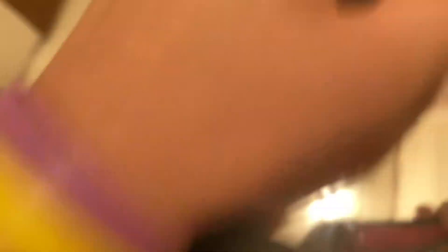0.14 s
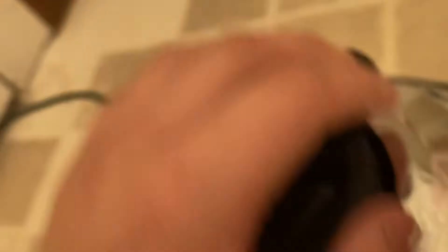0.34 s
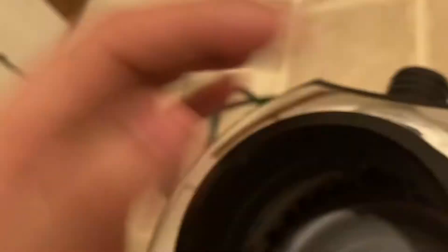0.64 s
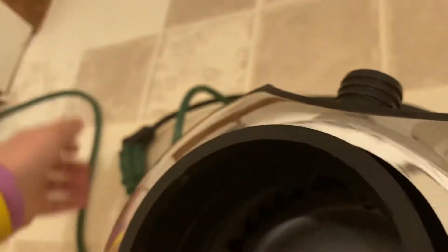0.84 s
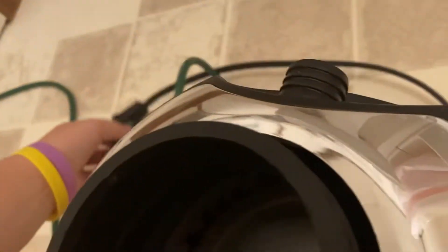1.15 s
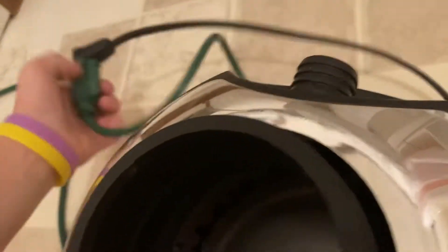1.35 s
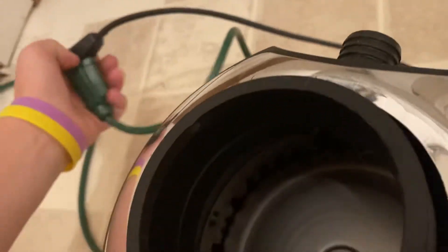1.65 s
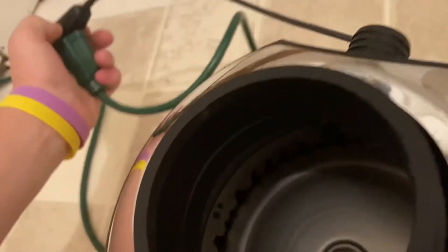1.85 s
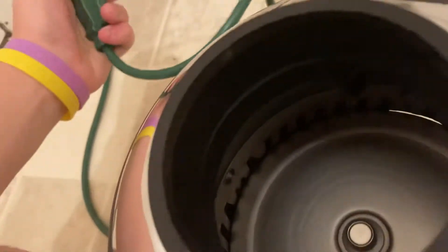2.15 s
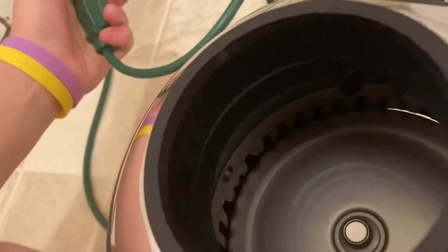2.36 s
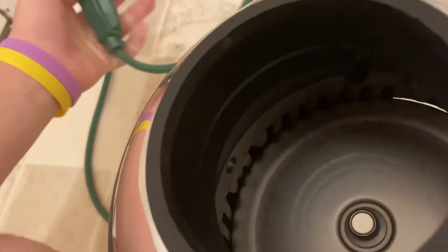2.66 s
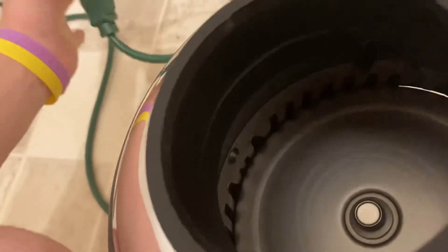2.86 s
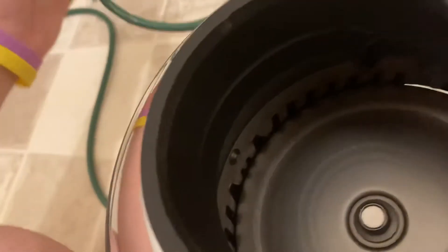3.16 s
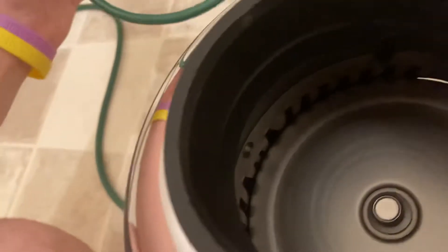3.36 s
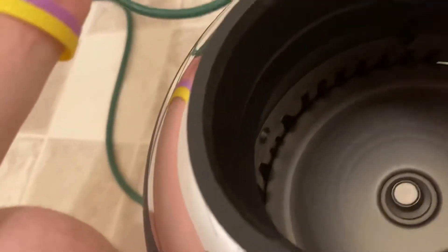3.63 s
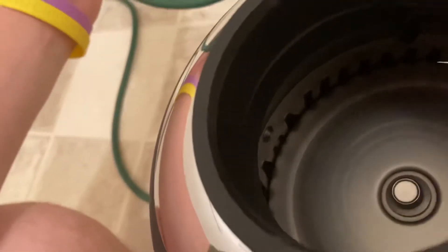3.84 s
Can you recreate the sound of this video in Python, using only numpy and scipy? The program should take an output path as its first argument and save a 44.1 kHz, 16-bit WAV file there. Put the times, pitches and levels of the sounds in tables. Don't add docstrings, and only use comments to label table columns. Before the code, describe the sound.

A loose garbage disposal buzzes and chatters loudly, then is unplugged and coasts down with rhythmic scraping

```python
import sys
import numpy as np
from scipy import signal
from scipy.fft import rfft, irfft, next_fast_len
from scipy.io import wavfile

SR = 44100
rng = np.random.default_rng(int(sys.argv[2]) if len(sys.argv) > 2 else 0)


def wav_out(sig):
    wavfile.write(sys.argv[1], SR, np.round(np.clip(np.atleast_2d(sig).T, -1, 1) * 32767).astype(np.int16))


def to_linear_factor(level_db):
    exponent = np.asarray(level_db, float) / 20
    return 10 ** exponent


N = 176400
T = np.arange(N) / SR
PAD = next_fast_len(N + SR // 2)
HZ = np.arange(PAD // 2 + 1) * SR / PAD + 1e-9

MAINS_HZ, RUN_HZ = 60, 29.773
OFF_S, DRAG_HZ_S, EASE_HZ_S2 = 2.14, 8.26, 1.18
CUT_S, CUT_FALL_S, HUM_FALL_S = 2.136, 0.00083, 0.017
BEAT_S = 1.13
BEAT_AT = .92
CHATTER_DB, CHATTER_S, SPREAD_DB, JITTER_S = 6, 0.0012, 3.5, 0.0003
LOCKED_DB, WOBBLE_DB, TICK_DB = -2, 1.5, -5
ON_DB, OFF_DB, LOW_ON_DB = 9, 17, -22.5
RUB_DEPTH_DB, RUB_AT, RUB_EDGE = 5.5, 0.008, 4
KNOCK_DB, KNOCK_AT, KNOCK_TURNS = 2.5, .06, .09
SNAP_DB, SNAP_S = -40.5, 0.0054
CUPPED_S, CUPPED_DB, CUPPED_HZ = 0.1893, -23.5, 380.8
CUPPED_PEAK_S, CUPPED_RISE_HZ_S = 0.033, 168
NODE_HZ, NODE_DB_S = 240, 9
DIFFUSE_DB, LOW_DIFFUSE_DB, SCATTER_DB = -16, -8, -3
CUTOFF_HZ = 15780

# (multiple of half mains [1], level [dB], left lead [rad])
FIELD_TONES = [(4, -34, 1.4), (8, -38, -2.3), (12, -36, -.6), (13, -49, .2), (14, -48, 1.3), (16, -43, .7),
               (20, -47, 2.6), (27, -36, .4), (28, -45, .5), (29, -37, 1.1), (35, -46, .4), (40, -43, .7),
               (41, -43, .9), (71, -48, 3.1), (75, -43, -2.4), (76, -37, -2.4), (77, -39, -2.3),
               (116, -42, .7), (117, -43, .7), (120, -49, .8)]
# (multiple of speed [1], sideband of twice mains [1], level [dB], left lead [rad])
ROTOR_TONES = [(2, 0, -37, .2), (4, 0, -41, .8), (6, 0, -47, 2), (8, 0, -44, 2.5), (11, 0, -49, -.5),
               (16, 0, -53, .5), (38, 0, -45, 1.5), (40, 0, -44, .4), (42, 0, -49, 1.2), (52, -2, -48, 2.9),
               (52, 0, -48, -.4), (52, 1, -43, -1.9), (52, 2, -53, -.4), (104, -1, -50, -.7),
               (104, 0, -38, 1), (104, 1, -48, .3)]
# (time [s], chatter [dB], shell ring [dB], hum [dB])
MICROPHONE_VIEW = [
    (0, -44.5, -52, -3.5),
    (.12, -44.5, -47.5, -5.5),
    (.2, -38.5, -41.5, -6),
    (.33, -34, -35.5, -3.5),
    (.5, -32.5, -36.5, -2.5),
    (.62, -30, -30, -1.5),
    (1.1, -29, -29, 1),
    (1.6, -30, -30.5, -0.5),
    (2.12, -30.5, -31.5, 0.5),
]
# (time [s], rub level [dB], unbalance level [dB])
COASTING = [
    (2.2, -46.5, -37),
    (3.502, -50, -40),
    (4.0, -52.5, -51),
]
# (multiple of speed [1], level [dB])
UNBALANCE_TONES = [(1, -27), (2, -5.5), (3, -7), (4, 4.5), (5, -17), (6, -2.5), (7, -21), (8, -15.5),
                   (9, -22), (10, -12.5), (11, -32), (12, -37), (13, -11), (14, -21), (15, -4.5)]
# (frequency [Hz], gain [dB])
FLOOR_RESPONSE = [(35, 5.5), (65, 9), (85, -3.5), (150, -3), (205, 4), (330, -8.5)]
# (frequency [Hz], width [Hz], level [dB])
SHELL_POWERED = [(352, 13, -4), (478, 40, -9), (866, 153, -7), (1204, 52, 6), (1507, 7.5, -1),
                 (2253, 79, 3), (3200, 70, -2), (3543, 39, 4.5), (4230, 37, -31), (5006, 100, 5),
                 (5690, 320, -3), (7400, 120, -9), (8510, 250, -7), (10560, 640, -15.5)]
SHELL_COASTING = [(324, 21, -2), (459.4, 29, -5), (1228.4, 63.4, 2.5), (2055, 51, 2), (2324, 99, 1),
                  (2485, 43, 5.5), (3540, 30, -2.5), (5000, 200, -16), (5460, 450, -7), (7050, 180, -10.5),
                  (8080, 170, -8), (9370, 690, -14.5), (10370, 840, -20.5), (12600, 100, -30)]
# (frequency [Hz], level [dB])
BED_POWERED = [(230, -22), (650, -21), (1800, -14), (4400, -16), (6500, -13.5), (12000, -17), (13500, -32),
               (15500, -52)]
BED_COASTING = [(250, -10.5), (750, -29.5), (1700, -14.5), (4000, -20.5), (6500, -23), (12000, -25.5),
                (13300, -52), (15000, -57)]
# (frequency [Hz], left lead [rad])
PORT_LEAD = [(0, 0), (1400, .7), (2300, 3.1), (3550, 5.2), (4200, 6.3), (5300, 9.0), (6950, 6.3),
             (15800, -6.3)]
# (frequency [Hz], lean [dB])
LEAN_POWERED = [(200, 1), (400, -3.5), (800, -1.5), (1300, 1.5), (8000, -0.3)]
LEAN_COASTING = [(200, 1.2), (1200, 2.6), (8000, .3)]
BEAT_LEVELS = [1.5, 0, 1.5, -21.5]
# (time [s], peak level [dB])
HARD_KNOCKS = [(0.1938, -21), (0.3273, -19), (0.4555, -20.5), (0.7917, -18), (0.8895, -16), (0.9418, -17),
               (1.0105, -21), (1.0773, -17), (1.1437, -17.5), (1.3969, -18), (1.4798, -21), (1.5382, -21),
               (1.564, -22.5), (1.5969, -17.5), (1.7337, -19), (1.7636, -15.5), (1.882, -21),
               (1.9391, -17.5)]
# (time [s], level [dB], frequency [Hz], t60 [s])
BODY_BUMPS = [
    (0.397, -12.5, 62, 0.065),
    (0.53, -33, 122, 0.16),
    (2.139, -27, 416, 0.22),
    (0.341, -20.5, 112, 0.13),
    (2.723, -43, 210, 0.091),
    (2.724, -31.5, 325, 0.25),
]
# (time [s], level [dB])
PLUG_HITS = [
    (2.7078, -29.5),
    (2.7108, -23),
    (2.728, -33),
]
# (frequency [Hz], level [dB], t60 [s])
PLUG_RING = [(1530, -1, 0.06), (1250, -14, .03), (2580, -4, 0.03), (3280, -11, 0.029), (8100, -6, 0.01)]
# (time [s], half length [s], frequency [Hz], half width
# [Hz], level [dB])
BAND_SWELLS = [(.1, .25, 480, 23, -14), (.1, 0.45, 763, 26, 11.5), (0.086, 0.11, 875, 15, -5),
               (0.44, 1.4, 264, 56, -9), (0.68, 0.11, 120, 25, -3), (0.27, 0.49, 2290, 130, -13),
               (1.21, 0.22, 2280, 110, 4.5), (1.66, 0.41, 2290, 110, -6.5), (0.42, 0.25, 1810, 160, 8.5),
               (1.6, 1.3, 1870, 74, -6), (0.15, 0.27, 3540, 220, -11.5), (0.23, .25, 1550, 20, 9),
               (2.18, 0.23, 3030, 220, -6.5), (3.6, 0.78, 2510, 27, -9), (0.346, 0.084, 318, 30, 11),
               (1.66, 0.36, 485, 16, -6.5), (0.56, 0.12, 480, 30, -2.5), (0.44, 0.84, 361, 17, -3),
               (2.5, 2, 60, 16, 1), (0.87, 0.18, 1270, 80, 2), (1.6, 1.2, 2860, 100, -7.5),
               (3.95, 0.63, 3900, 170, -22), (3.6, 0.2, 2060, 92, 6), (3.0, 0.97, 4680, 240, 7.5),
               (2.5, 5.2, 9730, 590, 2.5), (2.0, 4.0, 14000, 830, 2), (0.24, .2, 690, 53, -11),
               (2.53, 0.12, 325, 30, -11), (.26, 0.059, 140, 52, 0), (1.5, .8, 4320, 110, -9),
               (0.22, 0.35, 2830, 100, 8.5), (2.28, 0.17, 1110, 190, 4.5), (0.32, 0.095, 440, 55, 3.5),
               (1.2, 0.47, 684, 55, -4)]


def rms_one(x):
    return x / np.sqrt(np.mean(x ** 2) + 1e-20)


def in_time(rows):
    s, *columns = np.transpose(rows)
    return [np.interp(T, s, c) for c in columns]


def at_hz(points, hz):
    point_hz, value = np.transpose(points)
    return np.interp(np.log(hz), np.log(point_hz), value)


def drift(rate):
    r = np.exp(-80 * np.pi * rate / SR)
    noise = rng.standard_normal(N // 40 + 2002)
    slow = signal.lfilter([1], [1, -2 * r, r * r], noise)[2000:]
    return np.interp(np.arange(N) / 40, np.arange(len(slow)), rms_one(slow))


def split(x, hz):
    return [signal.sosfilt(signal.butter(2, hz, kind, fs=SR, output="sos"), x) for kind in ("low", "high")]


def shell(x, modes, bed):
    power = to_linear_factor(2 * at_hz(bed, HZ))
    for hz, width, db in modes:
        power = power + to_linear_factor(2 * db) / (1 + (2 * (HZ - hz) / width) ** 2)
    cepstrum = irfft(np.log(power / power.mean()) / 2, PAD)
    cepstrum[1:PAD // 2] *= 2
    cepstrum[PAD // 2 + 1:] = 0
    return irfft(rfft(x, PAD) * np.exp(rfft(cepstrum)), PAD)[..., :N]


def ring(s, db, hz, t60):
    u = np.maximum(T - s, 0)
    return to_linear_factor(db - 60 * u / t60) * np.sin(2 * np.pi * hz * u)


def turns():
    u = np.maximum(T - OFF_S, 0)
    angle = RUN_HZ * (T - OFF_S) - DRAG_HZ_S * u ** 2 / 2 + EASE_HZ_S2 * u ** 3 / 3
    return angle, RUN_HZ - DRAG_HZ_S * u + EASE_HZ_S2 * u ** 2


def powered(fall):
    return np.exp(-np.maximum(T - CUT_S, 0) / fall)


def chatter():
    count = int(CUT_S * 2 * MAINS_HZ)
    k, draw = np.arange(-4, count), rng.standard_normal((count + 4, 2))
    s = (k / 2 + 2 * BEAT_AT) / MAINS_HZ + JITTER_S * draw[:, 0]
    beat_db = np.array(BEAT_LEVELS)[k % 4] + SPREAD_DB * np.clip(draw[:, 1], -3, .8)
    hits = np.zeros(N)
    hits[(np.clip(s, 0, 3) * SR).astype(int)] = to_linear_factor(beat_db)

    at, db = np.transpose(HARD_KNOCKS)
    view_s, view_db = np.transpose(MICROPHONE_VIEW)[:2]
    hits[(at * SR).astype(int)] += to_linear_factor(db + TICK_DB - np.interp(at, view_s, view_db))
    burst = signal.lfilter([1], [1, -np.exp(-1 / (CHATTER_S * SR))], hits + 1e-18)

    cycle = int(2 * SR / MAINS_HZ)
    locked = split(np.resize(rng.standard_normal(cycle), N), 5200)[0] * to_linear_factor(LOCKED_DB)
    angle, _ = turns()
    swing = to_linear_factor(WOBBLE_DB * (np.cos(2 * np.pi * (angle - .1)) + 0.34 * drift(21)))
    rasp, rattle = rng.standard_normal((2, 3, N))
    noise = (rasp + split(rattle * to_linear_factor(CHATTER_DB) * burst, 3750)[1]) * swing
    noise[0] += locked

    shaken = shell(noise * powered(CUT_FALL_S), SHELL_POWERED, BED_POWERED)
    low, rest = split(shaken, 2360)
    middle, high = split(rest, 3250)
    top_db, ring_db, hum_db = in_time(MICROPHONE_VIEW)
    return low * to_linear_factor(LOW_ON_DB + .5 * hum_db) + middle * to_linear_factor(ring_db + 16) + high * to_linear_factor(top_db + ON_DB)


def hum():
    n = int((CUT_S + .2) * SR)
    t = T[:n]
    side, out = np.array([[.5], [-.5]]), np.zeros((2, N))
    tones = [(k * MAINS_HZ / 2, *rest) for k, *rest in FIELD_TONES]
    tones += [(k * RUN_HZ + 2 * j * MAINS_HZ, *rest) for k, j, *rest in ROTOR_TONES]
    _, ring_db, hum_db = in_time(MICROPHONE_VIEW)
    wavers = [drift(4.6)[:n] for _ in range(8)]
    waver_db = 1.5 + 8.1 * np.exp(-t / 0.3)
    for k, (hz, db, lead) in enumerate(tones):
        start = rng.uniform(0, 2 * np.pi) * (not 100 < hz < 250) + np.pi * (237 < hz < 239)
        if hz > 3200:
            seen = 0.83 * (ring_db[:n] - ring_db.max())
        else:
            seen = hum_db[:n] - 14 * (hz < 100) * np.exp(-t / 0.11)
        node = (abs(hz - NODE_HZ) < 5) - .4 * (abs(hz - 2 * NODE_HZ) < 5)
        seen = seen + NODE_DB_S * (t - 1.45) * node
        level = to_linear_factor(db + 4.5 + seen + waver_db * wavers[k % 8])
        out[:, :n] += level * np.cos(2 * np.pi * hz * (t - BEAT_S) + start + lead * side)
    return out * powered(HUM_FALL_S)


def rub():
    angle, _ = turns()
    touch = np.tanh(RUB_EDGE * (np.cos(2 * np.pi * (angle - RUB_AT)) - .2)) / 2 - .5
    turn = np.floor(angle - KNOCK_AT)
    size = to_linear_factor(1.1 * rng.standard_normal(200))[(turn - turn[0]).astype(int)]
    knock = to_linear_factor(KNOCK_DB) * size * np.exp(-(angle - KNOCK_AT - turn) / KNOCK_TURNS)
    scrape, thump = rng.standard_normal((2, 3, N))
    low, high = split(scrape, 1325)
    centre, high = split(high, 6150)
    mid = split(split(split(thump, 2940)[0], 4300)[0], 1200)[1]
    drive = low * to_linear_factor(1 + 0.16 * RUB_DEPTH_DB * touch + 0.69 * drift(30))
    drive += high * to_linear_factor(RUB_DEPTH_DB * touch + 0.3 * drift(42))
    drive += centre * to_linear_factor(0.77 * RUB_DEPTH_DB * touch - 2.5)
    drive += (mid + 0.46 * high) * knock
    return shell(drive, SHELL_COASTING, BED_COASTING) * to_linear_factor(in_time(COASTING)[0] + OFF_DB)


def unbalance():
    angle, hz = turns()
    tones = np.zeros(N)
    for k, db in UNBALANCE_TONES:
        level = to_linear_factor(db + at_hz(FLOOR_RESPONSE, k * hz) + 0.5 * drift(1.2))
        tones += level * np.cos(2 * np.pi * (k * angle + rng.random()))
    return tones * to_linear_factor(in_time(COASTING)[1] - 2.0) * (1 - powered(HUM_FALL_S))


def knocks():
    plug, snap = np.zeros(N), np.zeros(N)
    for s, db in PLUG_HITS:
        for hz, mode_db, t60 in PLUG_RING:
            plug += ring(s, db + mode_db + rng.normal(0, 2.8), hz, t60)
        snap += to_linear_factor(db) * (T > s) * np.exp(-np.maximum(T - s, 0) / SNAP_S)
    snap *= rng.standard_normal(N) * to_linear_factor(SNAP_DB - PLUG_HITS[0][1])
    return plug + snap + sum(ring(*bump) for bump in BODY_BUMPS)


def cupped():
    throb = (.5 + .5 * np.cos(np.pi * MAINS_HZ * (T - CUPPED_PEAK_S))) ** 0.77 * to_linear_factor(2.0 * drift(21))
    cycles = CUPPED_HZ * T + CUPPED_RISE_HZ_S * (T - CUPPED_S) ** 2 / 2
    closed = 1 / (1 + np.exp((T - CUPPED_S) / 0.012))
    return to_linear_factor(CUPPED_DB) * throb * np.sin(2 * np.pi * cycles) * closed


def ports(x):
    hz, lead = np.transpose(PORT_LEAD)
    turn = np.exp(.5j * np.interp(HZ, hz, lead) * np.array([[1], [-1]]))
    share = to_linear_factor(np.interp(HZ, [3600, 5100, 6800], [LOW_DIFFUSE_DB, SCATTER_DB, DIFFUSE_DB]))
    spec = rfft(x, PAD)
    return irfft((spec[0] * turn + share * spec[1:]) / np.sqrt(1 + share ** 2), PAD)[:, :N]


def lean(x, points):
    return irfft(rfft(x, PAD) * to_linear_factor(at_hz(points, HZ) * [[.5], [-.5]]), PAD)[:, :N]


def band_swells(x):
    spec, out = rfft(x, PAD), x.copy()
    for s, length, hz, width, db in BAND_SWELLS:
        band = irfft(spec * np.exp(-((HZ - hz) / width) ** 2), PAD)[:, :N]
        out += band * (to_linear_factor(db * np.exp(-((T - s) / length) ** 2)) - 1)
    on, off = lean(out, LEAN_POWERED), lean(out, LEAN_COASTING)
    return off + (on - off) * powered(HUM_FALL_S)


def scene():
    air = chatter() + rub()
    air[0] += unbalance() + knocks() + cupped()
    return band_swells(ports(air) + hum())


def band_limit(x):
    return signal.sosfilt(signal.butter(12, 17030, fs=SR, output="sos"), x)


def record(dry):
    low_cut = signal.sosfilt(signal.butter(3, 42, "high", fs=SR, output="sos"), dry)
    top_cut = signal.sosfilt(signal.ellip(10, 1, 70, CUTOFF_HZ, fs=SR, output="sos"), low_cut)
    return band_limit(top_cut)


dry = scene()
out = record(dry)
wav_out(out)
```